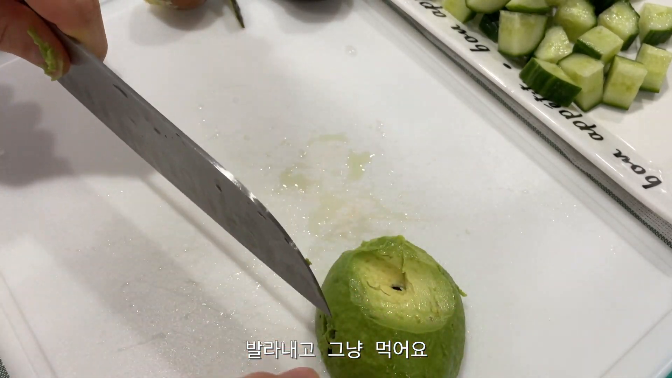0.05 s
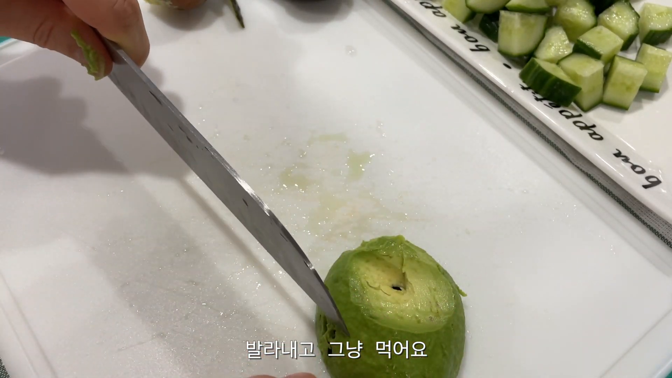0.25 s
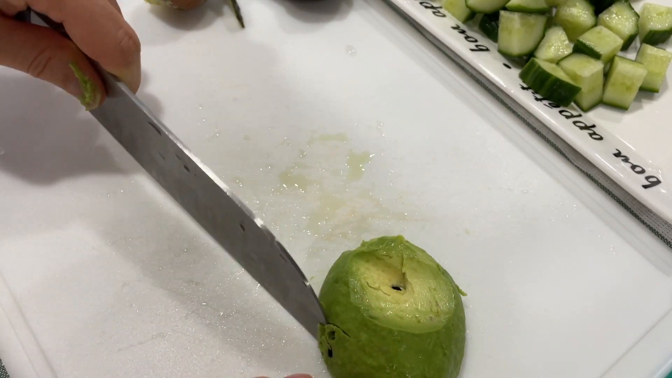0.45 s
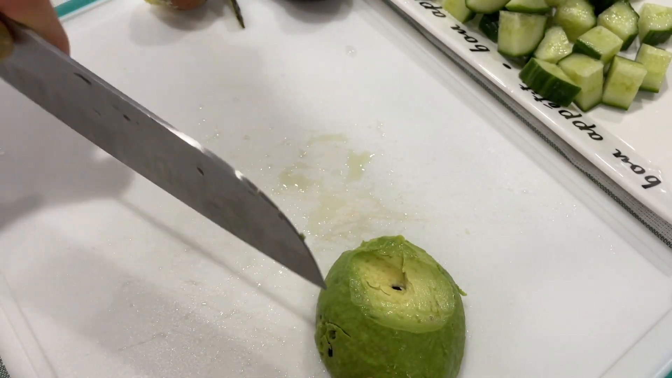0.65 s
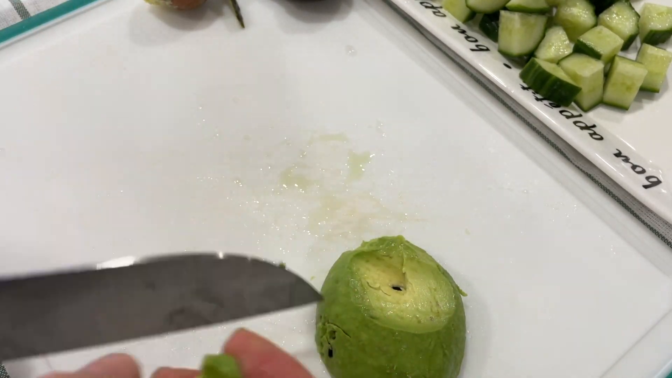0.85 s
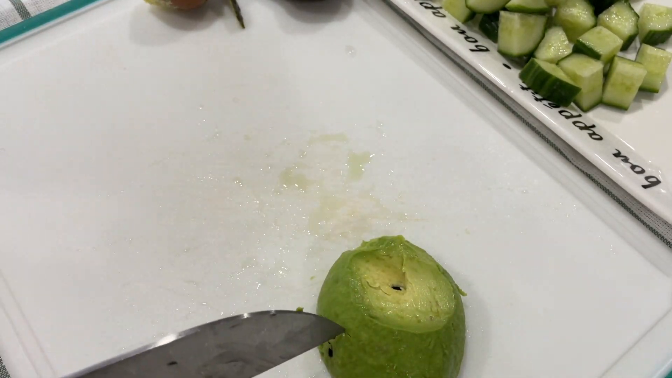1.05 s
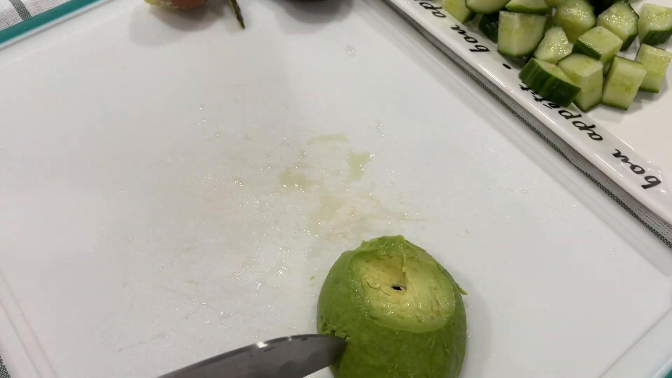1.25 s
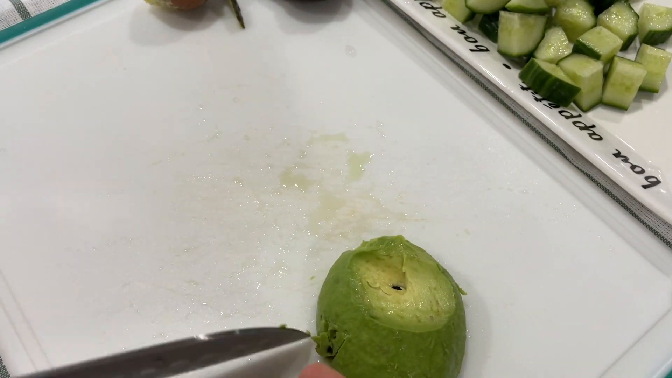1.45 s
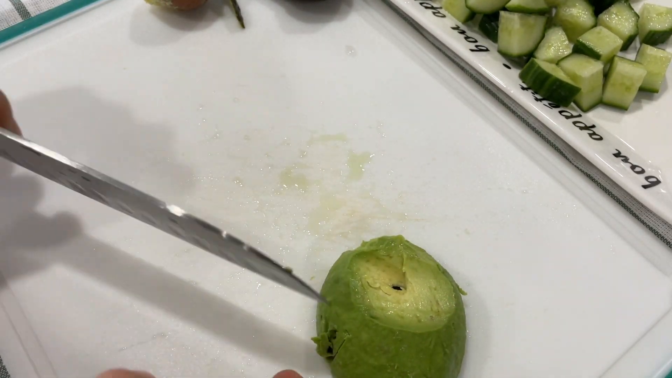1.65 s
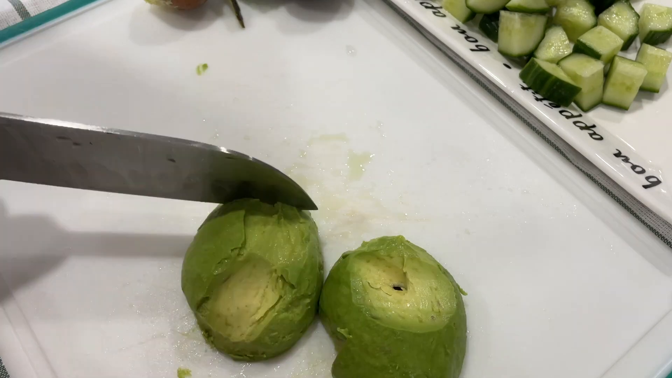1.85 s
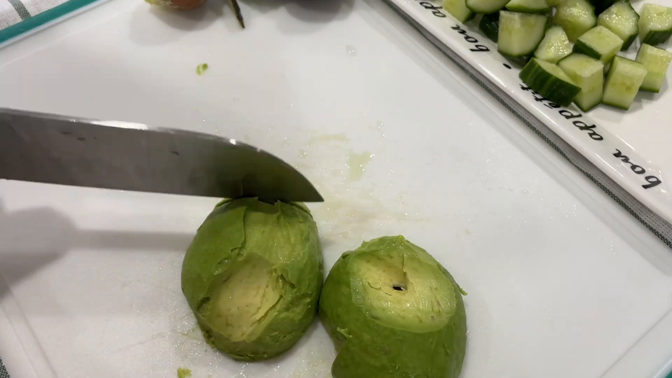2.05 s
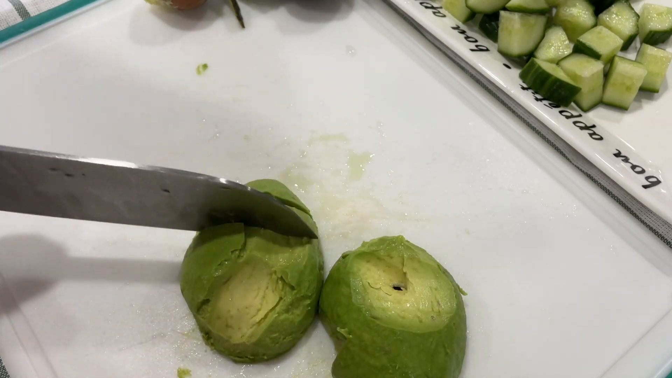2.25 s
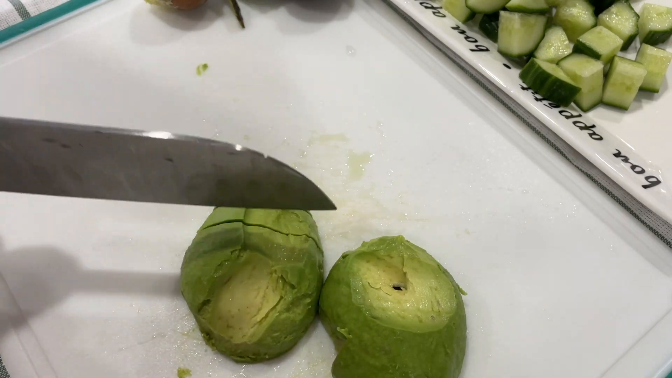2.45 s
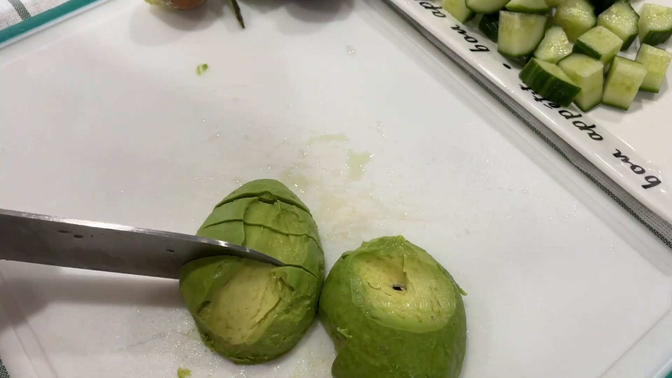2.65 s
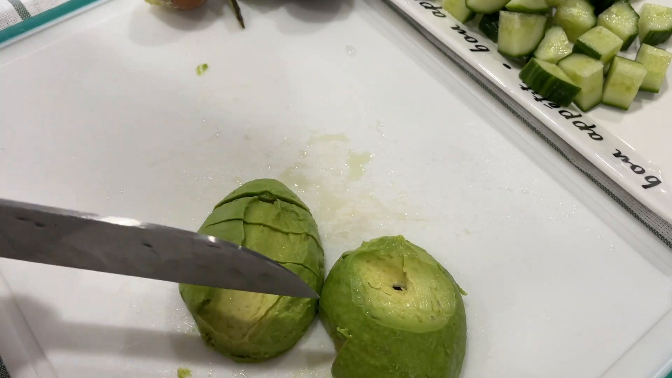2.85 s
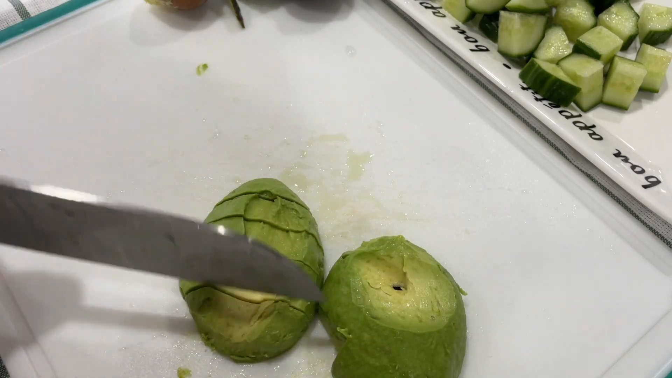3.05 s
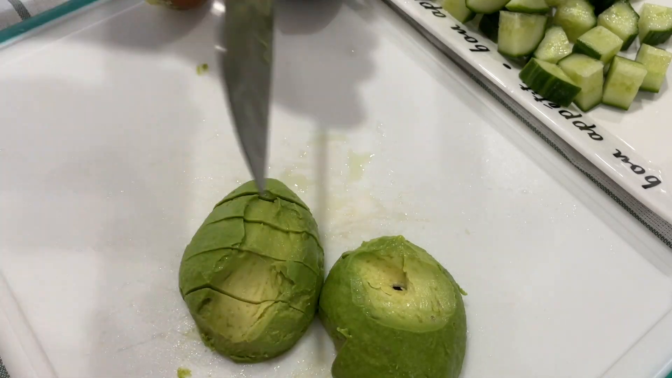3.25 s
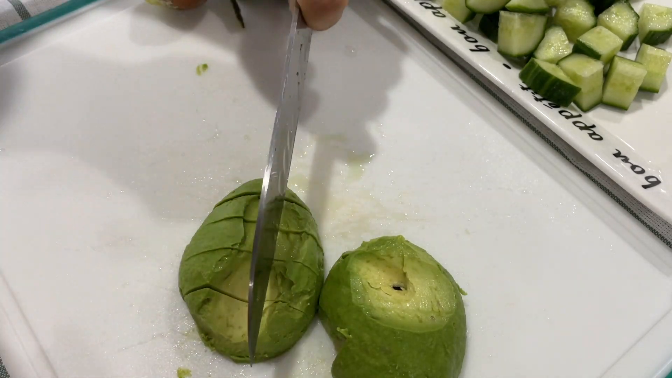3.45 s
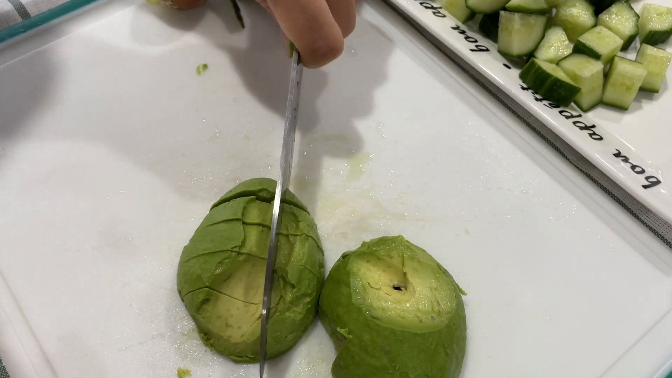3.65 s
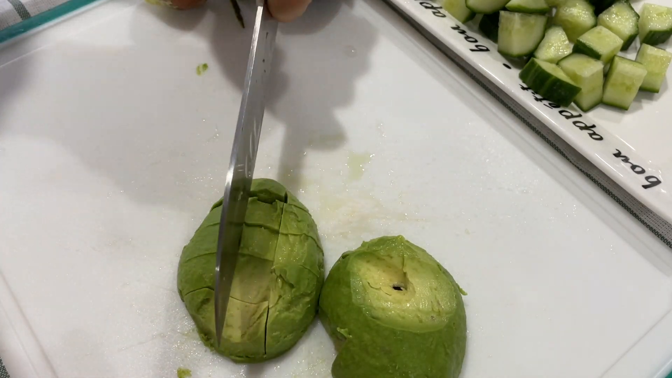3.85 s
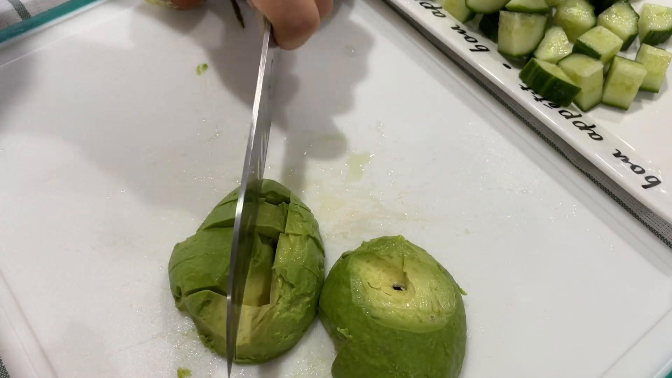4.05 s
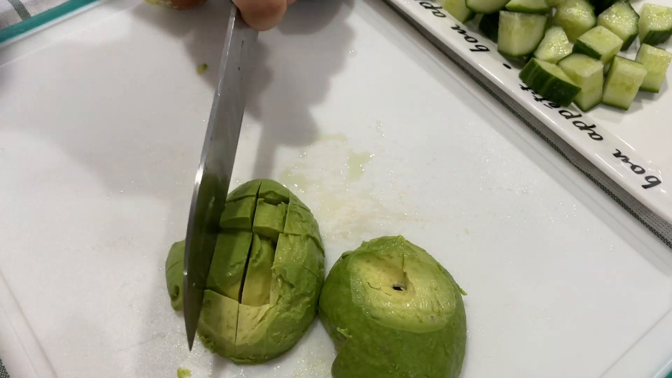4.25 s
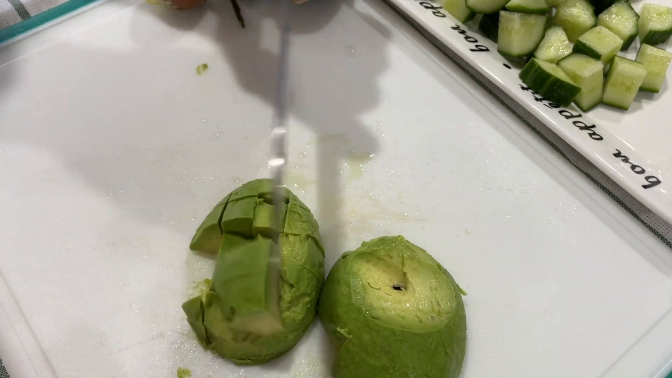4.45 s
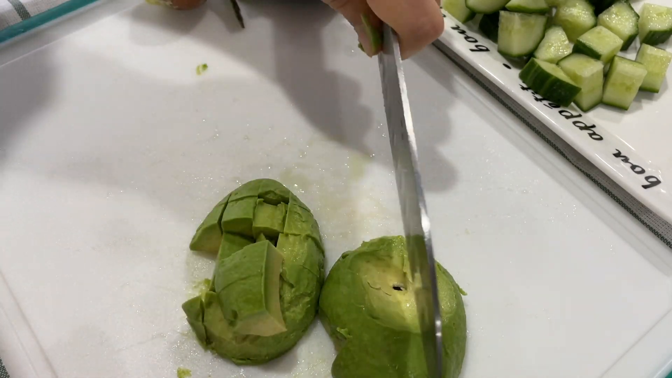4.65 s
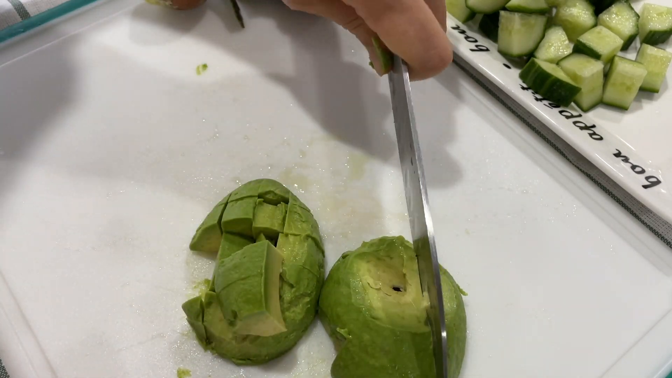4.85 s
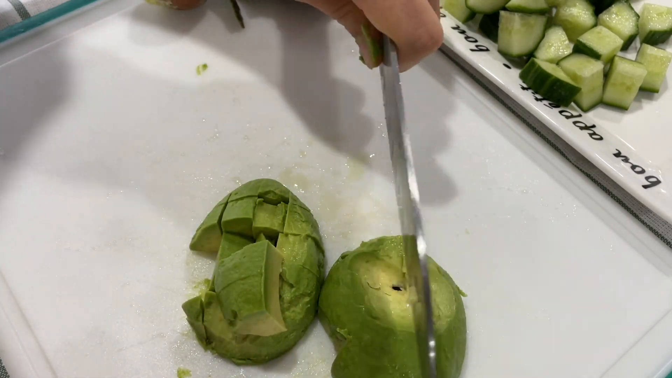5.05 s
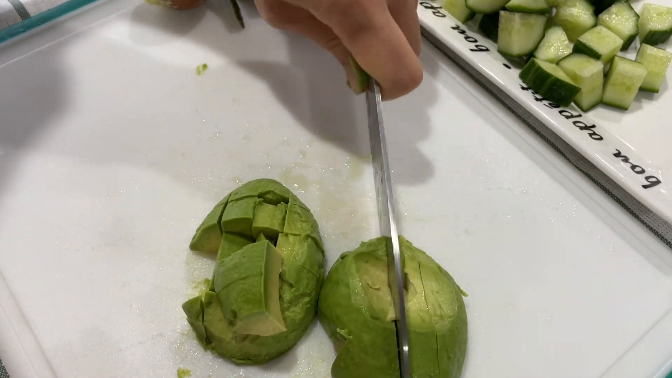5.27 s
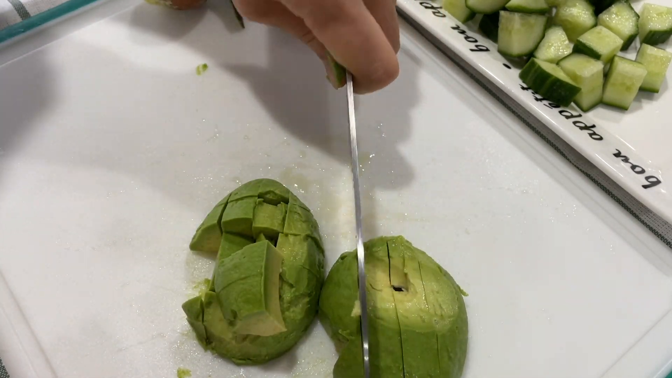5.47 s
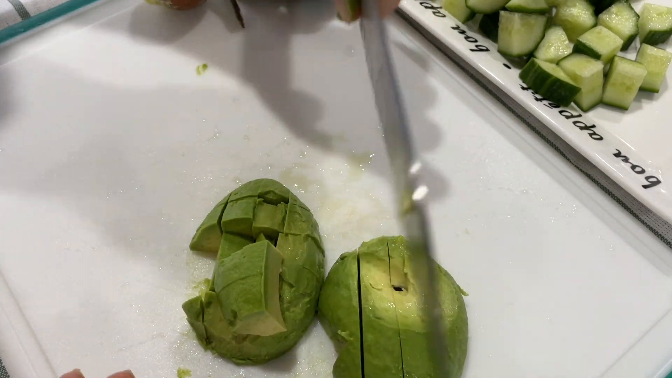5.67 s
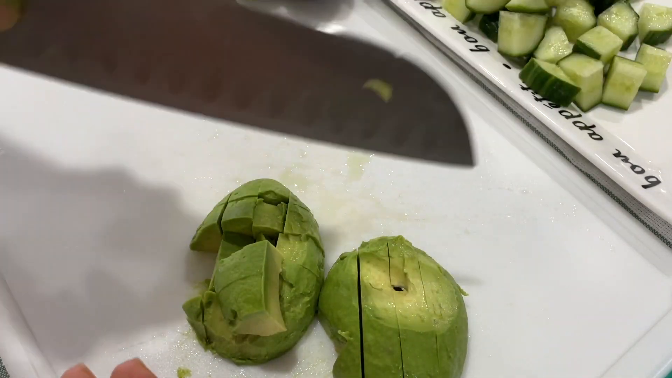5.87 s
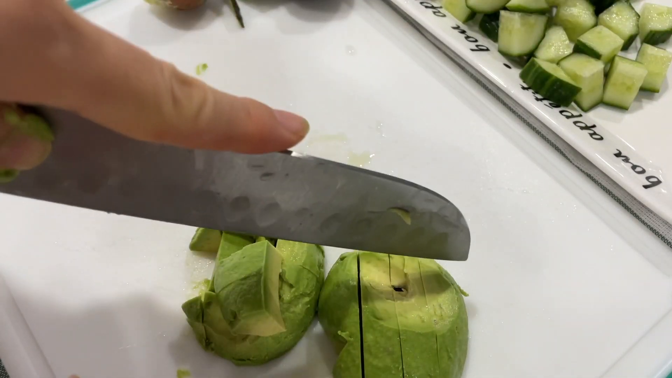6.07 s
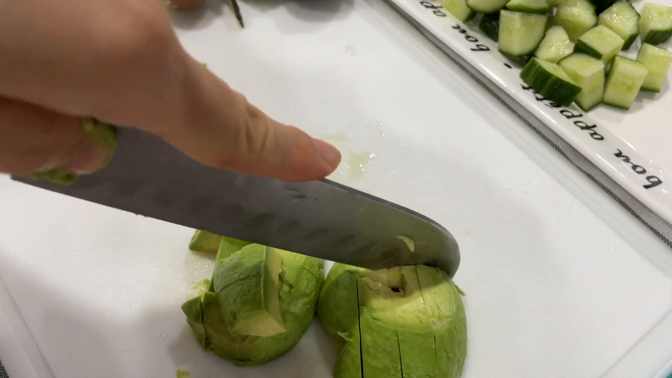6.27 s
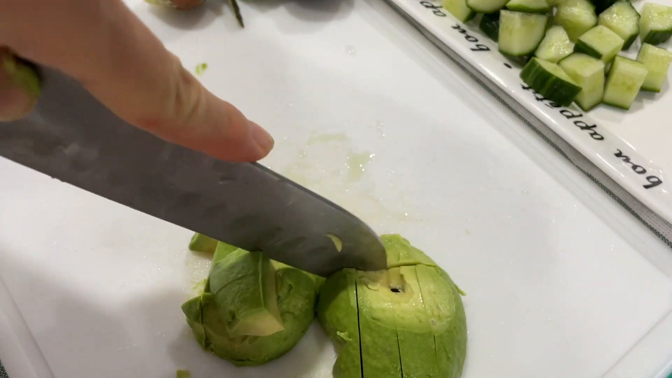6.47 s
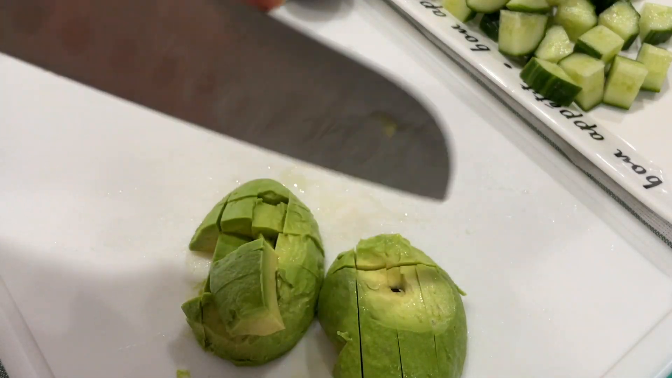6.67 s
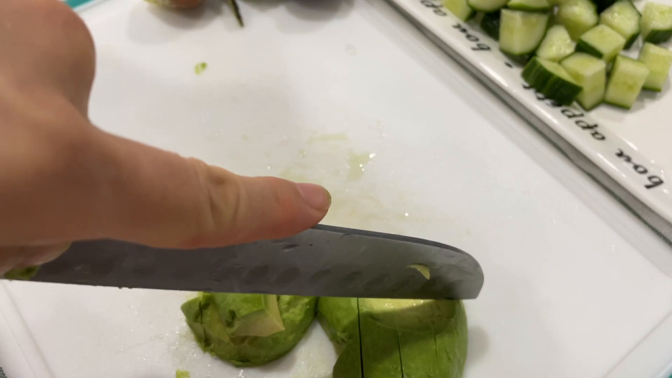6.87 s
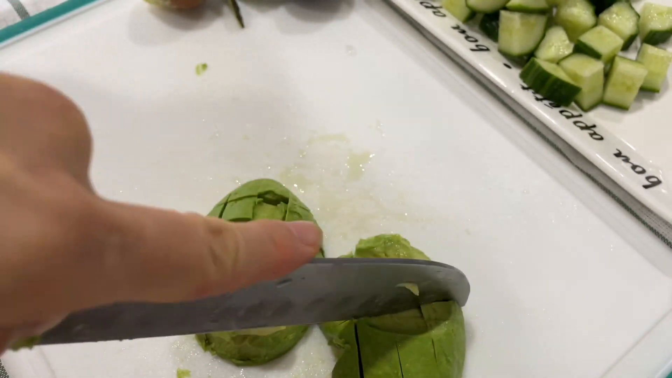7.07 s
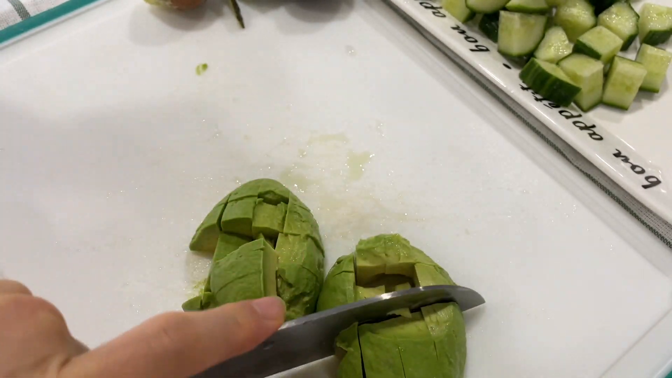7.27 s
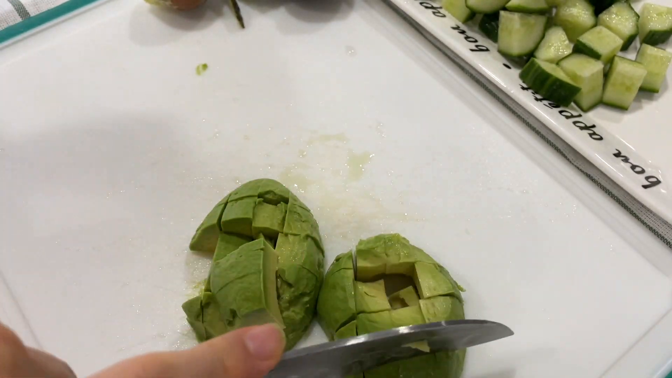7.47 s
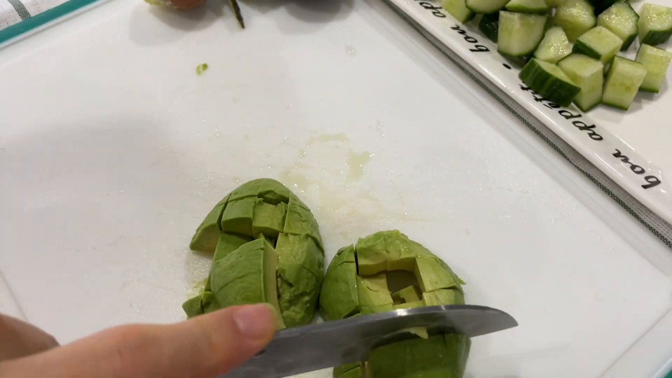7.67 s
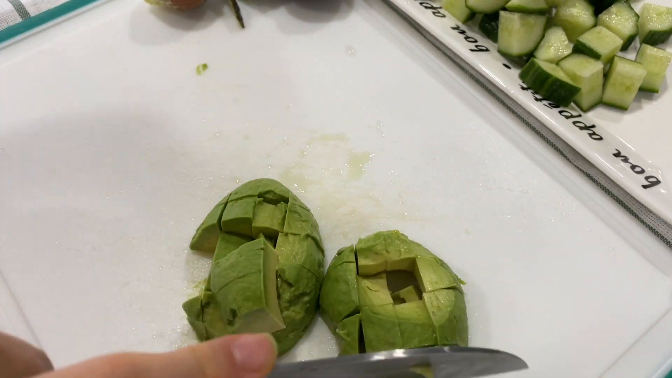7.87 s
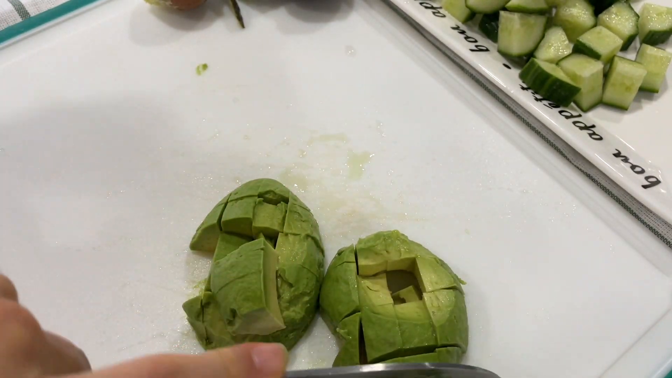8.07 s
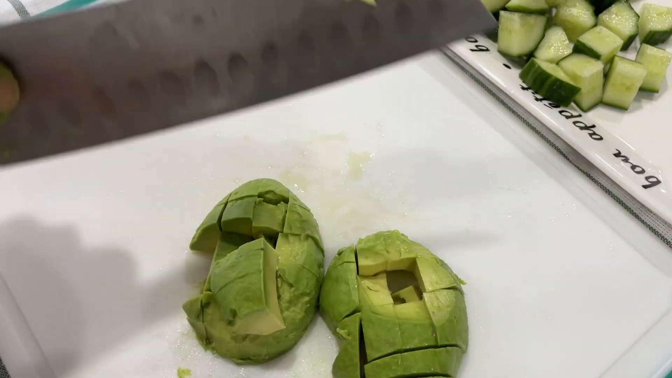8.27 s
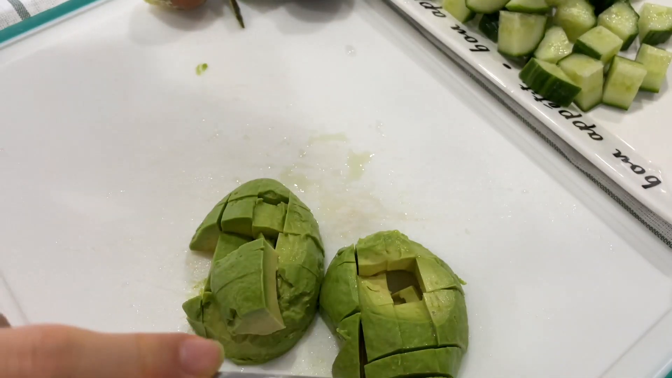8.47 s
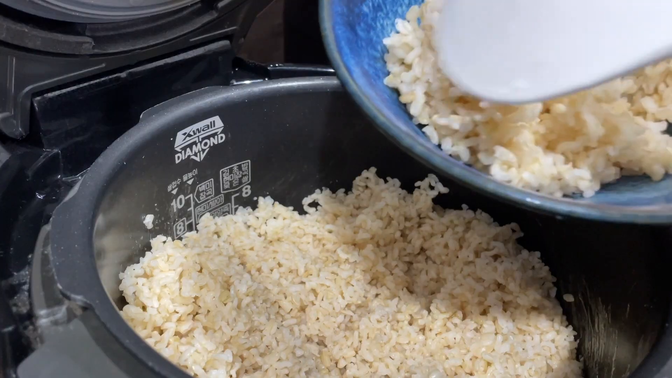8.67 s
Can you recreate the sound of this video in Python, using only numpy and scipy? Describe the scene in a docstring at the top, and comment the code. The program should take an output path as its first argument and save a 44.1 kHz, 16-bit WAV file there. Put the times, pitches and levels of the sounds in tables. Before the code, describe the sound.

Close up in a quiet kitchen with short reflections and a faint steady ventilation hum, a knife dices soft avocado on a plastic board. Each full cut is a tiny swelling crunch, a dry hollow knock with slight steel ring, then a brief scraping drag and moist slide. Cuts fall at 0.5 and 1.3 seconds, a light tip tap at 1.4, then a quicker series at 2.0, 2.3, 2.7 and 3.0. The hardest knock comes at 3.6, another strong one at 3.9, both with low counter boom, then 4.3, 4.9, 5.2 and 5.5. Wet smears follow around 5.7 to 6.4, with duller tip taps at 6.3, 6.4, 6.5, 7.0 and 7.2. A heavy booming cut lands at 7.5, a last brighter one at 8.0. Small sticky ticks, faint plinks and soft bumps appear between; a gentle smear and bump end it near 8.6.

```python
"""Dicing avocado on a plastic board

A kitchen knife cuts avocado halves close by: noise bursts crunch, knock and drag through board and blade modes.
The tip alone taps more dully; heavy landings add a low counter boom.
Grainy noise smears and short ticks are wet flesh on the steel, amid faint plinks and soft bumps.
A short noise reverberation is the kitchen; coloured noise and wavering sines are its air and hum."""
import sys
import numpy as np
from scipy import signal
from scipy.fft import rfft, irfft
from scipy.io import wavfile
from scipy.ndimage import uniform_filter1d

SR = 44100
rng = np.random.default_rng(int(sys.argv[2]) if len(sys.argv) > 2 else 0)


def put_to_file(sound):
    """Save the sound as 16-bit audio at rate SR, in the file named by the first command-line argument."""
    columns = np.atleast_2d(sound).T  # one column per channel
    safe = np.clip(columns, -1, 1)
    whole_steps = np.round(safe * 32767)
    wavfile.write(sys.argv[1], SR, whole_steps.astype(np.int16))


N = 384552
SIZE, LEAD = 8192, SR // 25  # samples: event frame, and its part before contact
HZ = np.maximum(np.arange(SIZE // 2 + 1) * SR / SIZE, 1)
AGE_S = (np.arange(SIZE) - LEAD) / SR  # time since contact
USUAL_DB = 16  # level and hand weight of an ordinary cut

# full cuts, levels before trim: (t/s, level/dB, low-band level from hand weight/dB, steel ring/dB,
# edge hiss/dB, draw along the board/dB)
CUTS = [(0.4852, 14.5, 14.5, -4, -11, -.5), (1.3096, 19, 10.5, 0, -3, -1),
        (1.9535, 16.5, 21.5, -2.5, -13.5, -1.5), (2.3206, 14.5, 14, -1, -11, 0),
        (2.653, 12.5, 12, .5, -6, .3), (2.9833, 14, 12.5, 1, -4, -1.8), (3.5779, 28.5, 31, 6.5, -.5, -3.5),
        (3.9456, 22, 25.5, 2.5, -1, -1.3), (4.333, 16, 19, 3.5, 1.5, -2.5), (4.913, 11.5, 7, 3, 2.5, -1.5),
        (5.218, 14.5, 7.5, -1.5, -1, 1.2), (5.527, 15.5, 7.5, -4, -5.5, 1.8),
        (7.529, 20.5, 21.5, 4, 1.5, 3.3), (8.0216, 15, 15.5, 6.5, 6, -1.8)]


def undb(db):
    """Decibels to amplitude gain."""
    return 10 ** (np.asarray(db) / 20)


def curve(points, hz=HZ):
    """Interpolate (f/Hz, value) points on a log-frequency axis."""
    f, value = np.transpose(points)
    return np.interp(np.log(np.maximum(hz, 1)), np.log(f), value)


def add(out, x, s):
    """Mix x in at time s."""
    i = int(round(s * SR))
    out[..., i:i + x.shape[-1]] += x[..., :N - i]


def ring(force, db):
    """Pass a short force through the causal minimum-phase resonator of gain db."""
    cepstrum = irfft(np.log(undb(db)))
    cepstrum[1:SIZE // 2] *= 2
    cepstrum[SIZE // 2 + 1:] = 0
    response = np.exp(rfft(cepstrum))
    return irfft(rfft(force) * response)


def colour(x, points):
    """Shape a long signal's spectrum, then scale to rms 1."""
    gain = undb(curve(points, np.arange(N // 2 + 1) * SR / N))
    y = irfft(rfft(x) * gain, N)
    return y / y.std()


def spread(n, wide_hz=650):
    """Stereo noise of a diffuse field: alike in the bass, unrelated in the treble."""
    mid, side = rfft(rng.standard_normal((2, n)))
    width = np.clip(np.arange(n // 2 + 1) * SR / n / wide_hz, .2, 1)
    left_right = np.array([mid + width * side, mid - width * side])
    return irfft(left_right / np.sqrt(1 + width ** 2), n)


def scatter(envelope, wide_hz=650, size=61):
    """Stereo burst of many small pushes under an envelope, its energy levelled across the spectrum."""
    burst = rfft(spread(SIZE, wide_hz) * envelope)
    power = uniform_filter1d(np.mean(abs(burst) ** 2, axis=0), size)
    return irfft(burst / np.sqrt(power))


def push(s):
    """A single sharp contact, s seconds after the first: one unit sample."""
    return 1. * (np.arange(SIZE) == LEAD + int(round(s * SR)))


def fade(t60_s):
    """Exponential decay from the moment of contact."""
    return (AGE_S >= 0) * undb(-60 * abs(AGE_S) / t60_s)


def wander(axis, step):
    """Random line with a new normal value of spread 1 every step, joined linearly."""
    return np.interp(axis / step, np.arange(SIZE), rng.standard_normal(SIZE))


def hum(waver=0.37):
    """Ventilation air as coloured noise, with motor and mains lines wavering in level and phase."""
    # air spectrum, relative: (f/Hz, level/dB)
    air_spectrum = [(20, -10.5), (60, -2), (100, -4.5), (230, -4), (330, -3), (420, -10), (550, -14),
                    (750, -18), (1130, -23.5), (1500, -33), (3000, -42), (6500, -47), (8500, -57),
                    (15000, -57.5)]
    # hum lines: (f/Hz, rms before waver/dB)
    lines = [(59.2, -69.5), (296.1, -72.5), (344.5, -71), (516.8, -78.5), (1125, -85)]
    air_rms_db = -57
    t = np.arange(N) / SR
    out = undb(air_rms_db) * colour(spread(N), air_spectrum)
    for hz, db in lines:
        slow = np.interp(t, np.linspace(0, t[-1], num=30), rng.standard_normal(size=30))
        amplitude = np.sqrt(2) * undb(db) * (1 + waver * slow)
        out = out + amplitude * np.sin(2 * np.pi * hz * t + slow)
    return out


def blips(rows, width, t60_s, trim_db):
    """Narrow-band noise that rises softly and dies out; width is relative to the pitch."""
    out = np.zeros((2, N))
    for s, hz, db in rows:
        bandpass = 1 / (1 + ((HZ - hz) / (width * hz)) ** 4)
        rise = np.clip(AGE_S / 0.014, 0, 1)
        band = irfft(rfft(spread(SIZE)) * bandpass) * fade(t60_s) * rise
        early_rms = band[:, LEAD:2 * LEAD].std()
        add(out, band * undb(db + trim_db) / early_rms, s - LEAD / SR)
    return out


def plinks():
    """Faint pitched plinks in the room, from narrow noise bands."""
    # plinks: (t/s, f/Hz, level before trim/dB)
    plink_rows = [(.08, 2370, -79), (.325, 1550, -66), (.73, 1460, -61), (1.0, 1405, -68), (1.2, 1550, -63),
                  (1.655, 2440, -74.5), (5.163, 1630, -57), (6.71, 3056, -81), (7.745, 2500, -72)]
    return blips(plink_rows, width=.1, t60_s=0.25, trim_db=4)


def slides():
    """Every cut slides into the flesh and out again; a longer draw rubs harder on the way out."""
    # (s from contact, sigma s, rub dB, wet fizz dB), levels before draw and trim
    slide_in, slide_out = (-.03, .016, -79, -88), (.087, .017, -66, -86.5)
    rub_db_per_draw_db = 3.0  # the fizz grows half as much
    rows = []
    for s, *_, draw_db in CUTS:
        for slide, more_db in ((slide_in, 0), (slide_out, rub_db_per_draw_db * draw_db)):
            after, sigma_s, rub_db, fizz_db = slide
            rows.append((s + after, sigma_s, rub_db + more_db, fizz_db + more_db / 2))
    return rows


def grains(spread_db):
    """Noise whose samples jump randomly in level, as a film breaking up in fine grains."""
    jumps = np.minimum(rng.exponential(size=N), 5)
    return rng.standard_normal(N) * undb(spread_db * jumps)


def smears(rub_grain_db=4, fizz_grain_db=6):
    """Soft flesh rubs along the steel while its wet film breaks up: two grainy noises in bell strokes."""
    # separate wipes along the blade, levels before trim: (peak t/s, sigma/s, rub/dB, wet fizz/dB)
    wipes = [(0.759, 0.025, -62.5, -83), (1.444, 0.006, -64, -77), (1.87, 0.05, -78, -97),
             (3.184, 0.027, -78, -85), (4.575, 0.008, -66, -96), (4.695, 0.022, -66, -84),
             (5.709, 0.017, -69.5, -91), (5.838, 0.015, -60, -84), (6.19, 0.11, -77, -93),
             (6.436, 0.021, -60, -81), (6.849, 0.017, -68.5, -96), (7.258, 0.036, -70, -73),
             (8.675, 0.023, -69, -87)]
    # rub spectrum, relative: (f/Hz, level/dB)
    rub_spectrum = [(300, -24), (1200, -3.5), (2800, 2.5), (4500, -2.5), (6500, -10), (8500, -40.5),
                    (15000, -34)]
    # fizz spectrum, relative: (f/Hz, level/dB)
    fizz_spectrum = [(2000, -12.5), (6000, -9.5), (10500, 6.5), (13000, -3), (15000, -25.5)]
    t = np.arange(N) / SR
    rub, fizz = np.zeros((2, N))
    for s, sigma_s, rub_db, fizz_db in wipes + slides():
        stroke = np.exp(-np.minimum(((t - s) / sigma_s) ** 2 / 2, 50))
        rub += undb(rub_db) * stroke
        fizz += undb(fizz_db) * stroke
    rubbing = rub * colour(grains(rub_grain_db), rub_spectrum)
    fizzing = fizz * colour(grains(fizz_grain_db), fizz_spectrum)
    return rubbing + fizzing


def resonances():
    """Lift in dB that the modes of board and blade give to a blow, one bell per mode."""
    # modes: (f/Hz, half width/Hz, full lift/dB)
    modes = [(274, 29, 7.5), (419, 29, 7), (693, 19, 4.5), (806, 92, 5.5), (965, 30, 2), (1510, 42, 3),
             (1730, 56, 2.5), (1882, 18, 5), (2140, 30, 4), (2366, 60, 6.5), (5040, 350, 6),
             (6940, 120, 2.5)]
    return sum(lift / (1 + ((HZ - hz) / half_width) ** 2) for hz, half_width, lift in modes)


def crunch(db, rise_s=.0075):
    """Flesh gives way faster and faster just before contact: a noise burst that swells, then stops."""
    return undb(db) * scatter((AGE_S < 0) * np.exp(-(AGE_S / rise_s) ** 2))


def landing(s, t60_s=.011, wide_hz=4500):
    """The edge bites into the plastic within milliseconds, s seconds after the first contact."""
    return np.roll(scatter(fade(t60_s), wide_hz), int(s * SR), axis=1)


def knocks(chatter=.45, chatter_t60_s=.045, drag_db=-7.5, drag_s=.095, uneven_db=4.2, patchy_db=2.0, trim_db=-2.5):
    """The edge lands, rocks down, chatters and is drawn along the board, which rings with the blade."""
    # board under the whole edge, relative: (f/Hz, level/dB)
    board_spectrum = [(30, -25.5), (120, -25), (220, -16.5), (400, -11), (750, -3.5), (1050, -3.5),
                      (1350, -12.5), (2300, -13), (3200, -17.5), (4200, -28), (6500, -36), (8500, -53),
                      (12000, -54), (15000, -65)]
    # edge lands, rocks down and settles: (t after first contact/s, relative strength)
    rocking = [(0, 1), (.0035, 1.2), (.011, .45)]
    # dragging is brighter than landing: (f/Hz, gain/dB)
    drag_treble = [(2300, 0), (4000, 1.7)]
    # flesh muffles its own crunch: (f/Hz, gain/dB)
    crunch_treble = [(900, 0), (3000, -3.5)]
    crunch_db, crunch_drop = 8.5, 1.2  # drop is dB per dB of extra weight, which parts flesh faster
    tail_db = 14.5  # base level of drag and of what feeds the room
    patch_hz, clump_s, left_db = 70, .004, 2.5  # left_db: left over right channel
    near, far = np.zeros((2, N)), np.zeros(N)
    board = curve(board_spectrum) + resonances()
    stroke = np.clip(AGE_S / drag_s, 0, 1) ** .5 / (1 + (AGE_S / drag_s) ** 8)
    pan = undb([[left_db / 2], [-left_db / 2]])
    rocking_norm = np.linalg.norm([size for _, size in rocking])
    for s, db, weight_db, steel_db, edge_db, draw_db in CUTS:
        # where and how hard the edge lands shifts the balance of board and steel
        balance = [(130, 0), (380, weight_db - db), (650, 0), (1100, 0),
                   (1700, steel_db), (2550, steel_db), (4000, edge_db)]
        tone = board + curve(balance)
        # each spot on the board favours other modes
        tone = tone + patchy_db * wander(HZ, patch_hz)
        bright = tone + curve(drag_treble)
        contacts = pan * sum(size * landing(after) for after, size in rocking) / rocking_norm
        # the edge sticks and slips in clumps
        clumps = undb(uneven_db * wander(AGE_S - AGE_S[0], clump_s))
        blow = undb(db) * (contacts + chatter * scatter(fade(chatter_t60_s) * clumps))
        drag = undb(tail_db + draw_db + drag_db) * scatter(stroke * clumps)
        flesh = crunch(crunch_db - crunch_drop * max(weight_db - USUAL_DB, 0))
        sound = ring(flesh, tone + curve(crunch_treble)) + ring(blow, tone) + ring(drag, bright)
        add(near, undb(trim_db) * sound, s - LEAD / SR)
        add(far, ring(push(0), bright + tail_db + draw_db), s - LEAD / SR)
    return near, far


def kitchen(x, build_s=.008, trim_db=1.2):
    """Dense reflections from cupboards and walls: stereo noise, each octave dying at its own rate."""
    # reverberation: (f/Hz, t60/s)
    room_t60 = [(125, 0.03), (400, 0.31), (900, 0.324), (2300, 0.3845), (5000, 0.2566), (12000, .18)]
    n = 3 * SIZE
    t = np.arange(n) / SR
    hz = np.maximum(np.arange(n // 2 + 1) * SR / n, 1)
    noise, response = rfft(spread(n)), 0
    for centre_hz in 125 * 2. ** np.arange(8):
        band = np.clip(1 - abs(np.log2(hz / centre_hz)), 0, 1)
        decay = 1000 ** (-t / curve(room_t60, centre_hz))
        response = response + irfft(noise * band) * decay * np.minimum(t / build_s, 1)
    # the walls return every band with the same energy
    spectrum = rfft(response)
    power = uniform_filter1d(np.mean(abs(spectrum) ** 2, axis=0), size=121)
    response = irfft(spectrum / np.sqrt(power + 1e-6))
    response = response * np.minimum(2 * (1 - t / t[-1]), 1) ** 2  # the tail dies out fully
    return undb(trim_db) * signal.fftconvolve(x[None], response, axes=1)[:, :N]


def ticks(t60_s=.005):
    """Wet films snap as pieces part from the blade: very short noise bursts, a fainter one after each cut."""
    # loudest snaps: (t/s, relative level/dB)
    loud = [(2.0505, -28.5), (2.405, -22), (2.655, -23.5), (3.915, -30.5), (7.077, -23)]
    # snap spectrum, relative: (f/Hz, level/dB)
    snap_spectrum = [(500, -34.5), (2500, -20.5), (6000, -8), (8500, -13.5), (11000, -7), (13000, -9),
                     (15500, -20.5)]
    faint_db, faint_spread_db, window_s = -39, 2.5, (.05, .11)  # window counts from the cut
    out = np.zeros((2, N))
    faint = []
    for s, *_ in CUTS:
        faint.append((s + rng.uniform(*window_s), faint_db + faint_spread_db * rng.standard_normal()))
    for s, db in loud + faint:
        add(out, ring(scatter(fade(t60_s)), curve(snap_spectrum) + db), s - LEAD / SR)
    return out


def bumps():
    """Soft low bumps around the board, from wide noise bands."""
    # bumps: (t/s, f/Hz, level before trim/dB)
    bump_rows = [(.73, 130, -53), (2.225, 140, -55.5), (4.77, 152, -51.5), (8.61, 127, -54)]
    return blips(bump_rows, width=0.37, t60_s=0.35, trim_db=2.5)


def taps(trim_db=-2.5, rattle_db=-12, rattle_t60_s=0.078, ringing=0.58):
    """The tip meets the board once and rattles, cushioned by flesh that half damps the modes."""
    # tip alone: (t/s, level before trim/dB, blade/dB, crunch before contact/dB, room feed/dB)
    tap_rows = [(1.443, -3.5, 0, -4, -7), (6.254, 6.5, 1, -3, -6), (6.3917, 6.5, -1.5, -.5, -3),
                (6.5052, 15.5, -7.5, -15, -16), (6.9925, 16.5, 6, -9, -9), (7.187, 17, 1, -16, -14)]
    # board under the tip, relative: (f/Hz, level/dB)
    tip_spectrum = [(60, -24), (200, -19), (400, -5.5), (600, 1), (850, 2.5), (1250, -6), (2000, -19),
                    (3000, -34), (6000, -42.5), (8500, -55), (11000, -52), (15000, -66)]
    click_base_db, click_hold = 1.5, .45  # hold: share of the click that a softer tap keeps
    near, far = np.zeros((2, N)), np.zeros(N)
    for s, db, blade_db, crunch_db, room_db in tap_rows:
        click_db = click_base_db + click_hold * (USUAL_DB - db)
        balance = curve([(900, 0), (1800, blade_db), (2500, blade_db), (4000, click_db)])
        tone = curve(tip_spectrum) + ringing * resonances() + balance + db + trim_db
        force = push(0) + crunch(crunch_db) + undb(rattle_db) * scatter(fade(rattle_t60_s))
        force = force / np.sqrt(1 + undb(2 * crunch_db))  # crunch and contact share the energy
        add(near, ring(force, tone), s - LEAD / SR)
        add(far, ring(push(0), tone + room_db), s - LEAD / SR)
    return near, far


def thuds(boom=0.46, boom_t60_s=.07):
    """Heavy landings press the board onto the counter, which takes the hand's weight and booms briefly."""
    # heavy landings: (t/s, relative level/dB)
    thud_rows = [(3.581, 11.5), (3.946, 14), (4.913, 2.5), (7.532, 16.5)]
    # board against the counter, relative: (f/Hz, level/dB)
    thud_spectrum = [(20, -13), (50, -4), (90, -1), (140, 3.5), (220, -2), (330, -9.5), (600, -33),
                     (2000, -69)]
    out = np.zeros((2, N))
    for s, db in thud_rows:
        force = push(0) + boom * scatter(fade(boom_t60_s))
        add(out, ring(force, curve(thud_spectrum) + db), s - LEAD / SR)
    return out


def scene(smear_db=-1, smear_room_db=-4.5, tick_room_db=-12):
    """Board, blade and flesh close by, the kitchen around them."""
    knock, knock_far = knocks()
    tap, tap_far = taps()
    wet = undb(smear_db) * smears()
    tick = ticks()
    room_feed = knock_far + tap_far + undb(smear_room_db) * wet + undb(tick_room_db) * tick[0]
    room = kitchen(room_feed)
    small = plinks() + bumps()
    return knock + thuds() + tap + wet + tick + small + room + hum()


def record(dry, ceiling=1.15, top_hz=15800):
    """Round the very loudest peaks towards the ceiling and cut everything above top_hz steeply."""
    rounded = dry / (1 + (dry / ceiling) ** 4) ** .25
    lowpass = signal.ellip(8, .2, 70, top_hz, fs=SR, output="sos")
    return signal.sosfilt(lowpass, rounded)


dry = scene()
out = record(dry)
put_to_file(out)
```